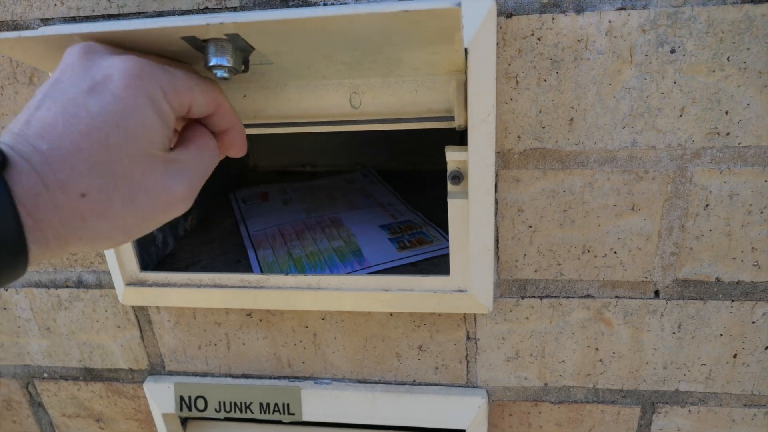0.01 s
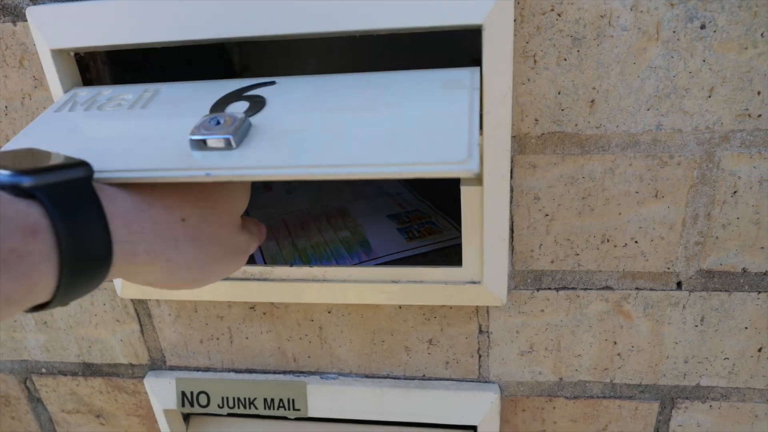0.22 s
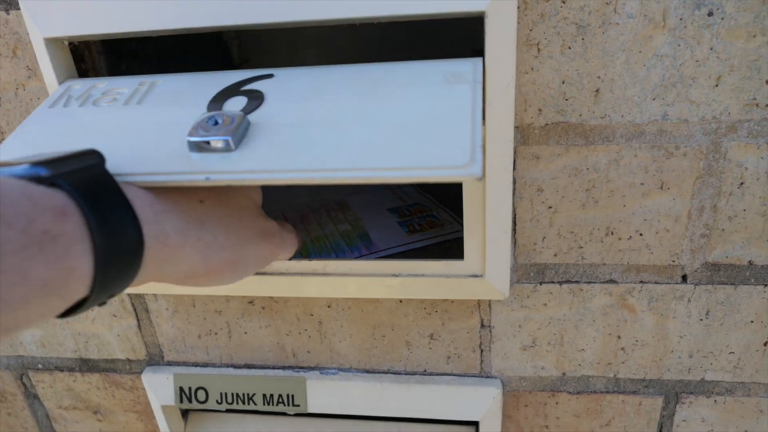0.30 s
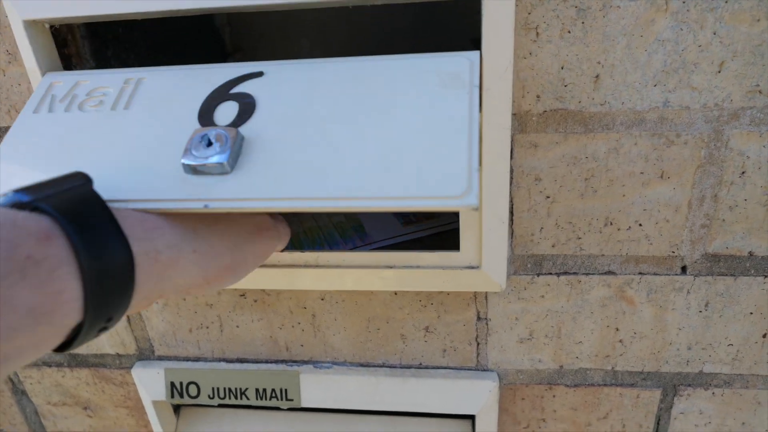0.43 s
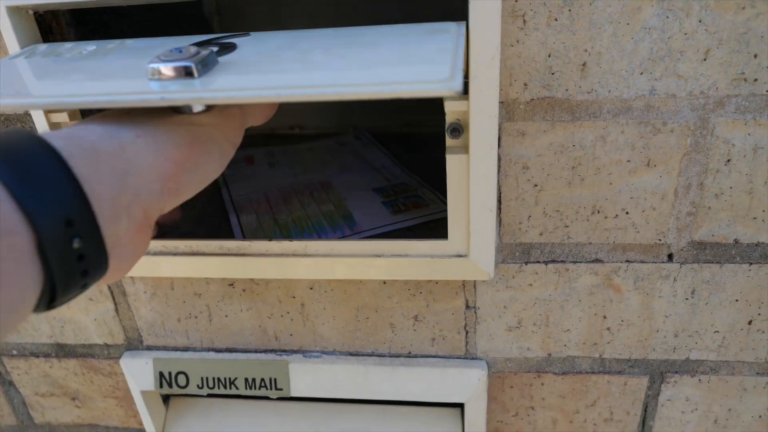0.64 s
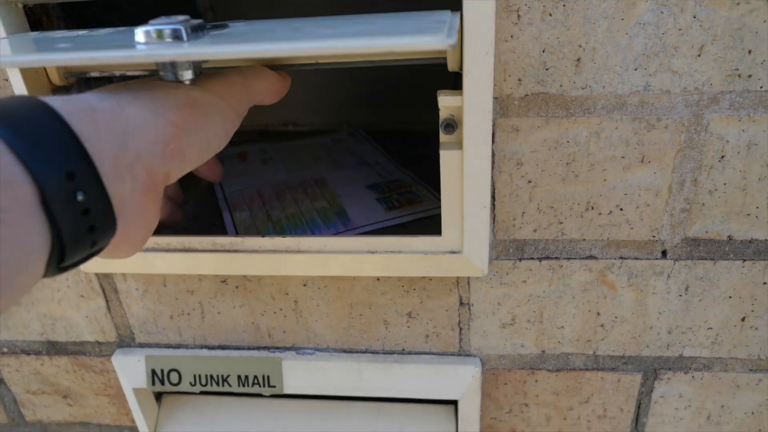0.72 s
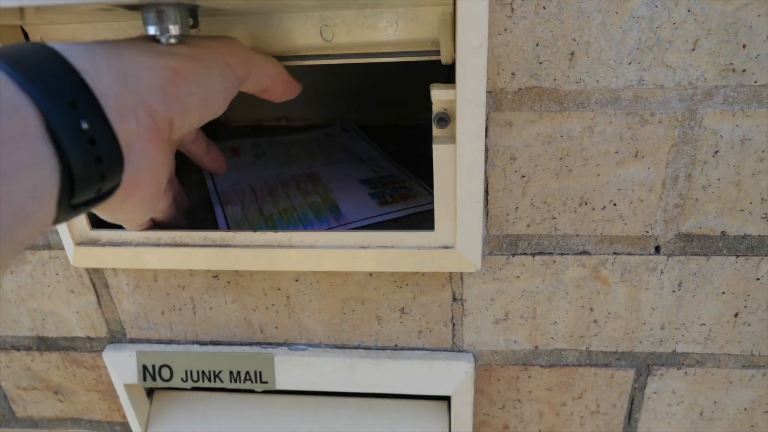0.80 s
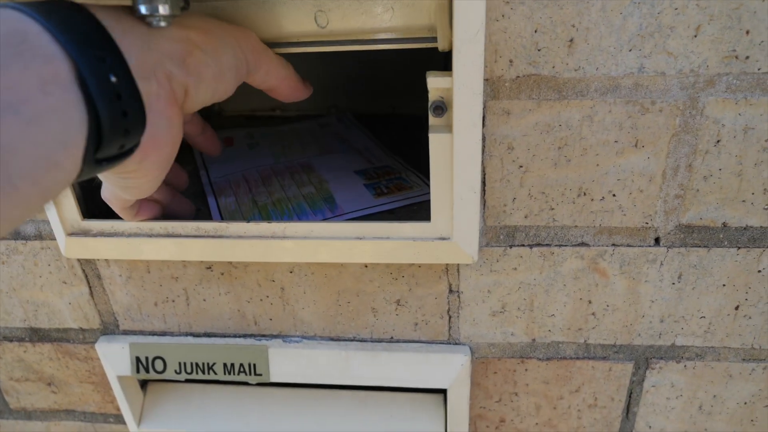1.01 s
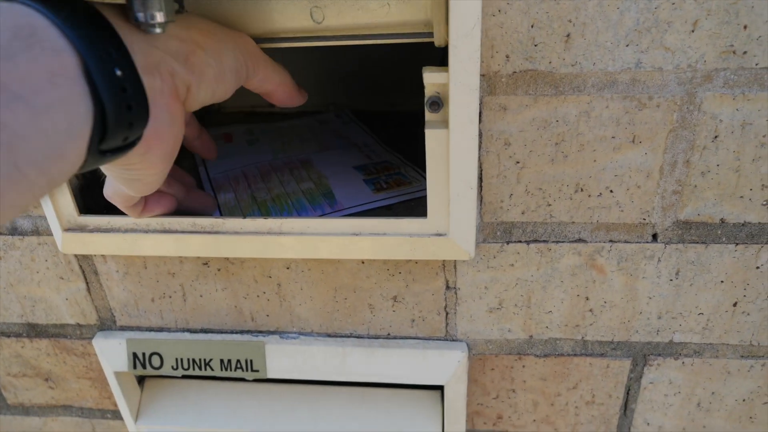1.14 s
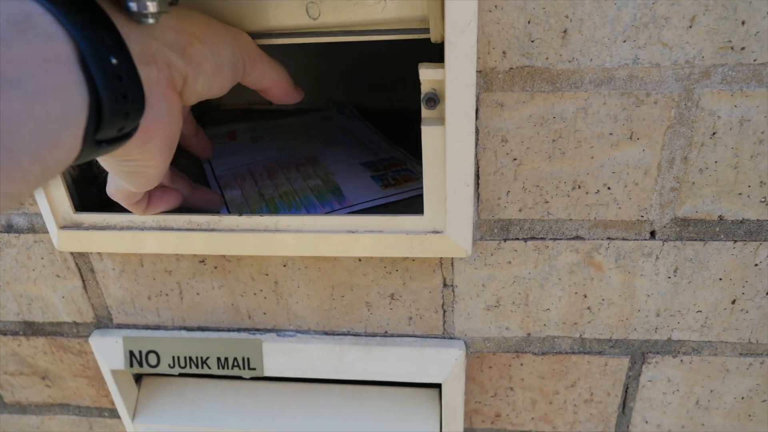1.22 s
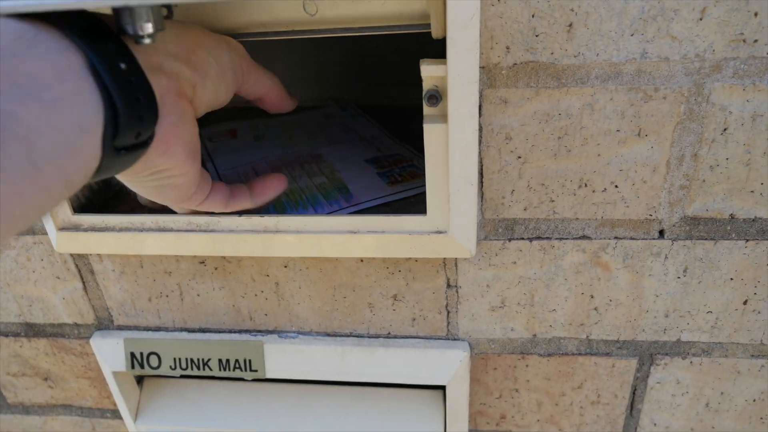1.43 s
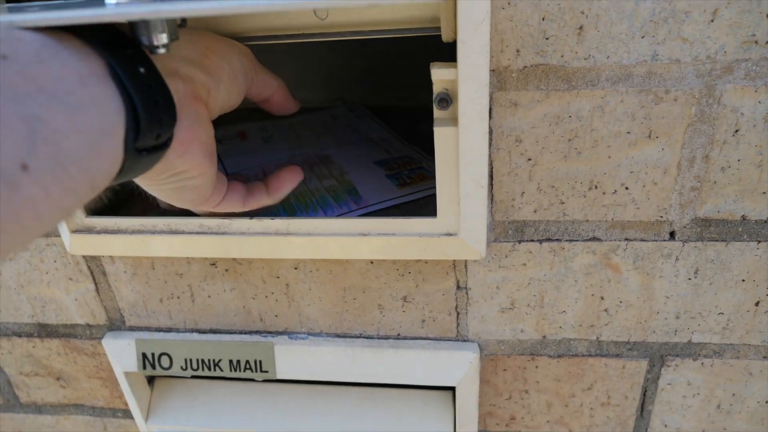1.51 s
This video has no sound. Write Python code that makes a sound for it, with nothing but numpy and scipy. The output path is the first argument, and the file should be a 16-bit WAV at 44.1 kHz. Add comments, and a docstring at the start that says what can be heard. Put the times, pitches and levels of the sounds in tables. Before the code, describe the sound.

A thin metal letterbox flap scrapes, squeaks and slams with a harsh clank, then paper shuffles

```python
"""A thin metal letterbox flap, let swing by a hand, scrapes, squeaks, slams into overload and rattles with its lock:
blows ring damped modes and a clattering sheet, stick-slip clicks drive the scrapes, a gliding sine squeaks.
Fingers then shuffle paper in the hollow box: fine grains excite a soft boom, a rub and a rustle.
Outdoors, filtered noise makes wind on the microphone and street hiss; sines make a thin whistle that
glides down and a few faint distant tones."""
import sys
import numpy as np
from scipy import signal
from scipy.fft import rfft, irfft
from scipy.io import wavfile
from scipy.ndimage import uniform_filter1d

SR = 44100
rng = np.random.default_rng(int(sys.argv[2]) if len(sys.argv) > 2 else 0)


def file_out(sig):
    """Save sig as 16-bit WAV at sys.argv[1]."""
    # one column per channel
    cols = np.atleast_2d(sig).T
    # limit, then scale
    lim = np.clip(cols, -1, 1)
    pcm = np.round(lim * 32767).astype(np.int16)
    wavfile.write(sys.argv[1], SR, pcm)


N = 70560  # samples, 1.6 s

# flap modes before the blow's tilt, scatter and ring scaling: f/Hz, level/dB, t60/s
FLAP_MODES = [(1578, -13.5, 0.24), (2289.6, -3, 0.28), (3081, -2, 0.075), (3741, -5.5, 0.14),
              (4510, -4, 0.057), (4914, -19, .1), (6900, -18, 0.18), (7850, -14.5, 0.094)]
# lock modes, likewise: f/Hz, level/dB, t60/s
LOCK_MODES = [(4030, -2, 0.034), (5170, -1, 0.014), (6850, 2.5, 0.0096), (7244, -4, 0.083),
              (8780, -6.5, 0.064)]
# blows: t/s, flap level/dB, lock level/dB, clatter peak level/dB, brightness/(dB per octave)
BLOWS = [(0.106, -23.5, -46, -15, 1), (0.1858, -22.5, -20.5, -15.5, -5), (0.2534, 2.5, -8, 10.5, 3),
         (.275, -8, -9, 5.5, 1.5), (0.3504, -35, -35, -20, -0.5), (0.5056, -39, -30, -26.5, -5),
         (0.5527, -41, -19.5, -15.5, 1), (.598, -22.5, -26, -16, -4.5), (0.621, -39, -34, -26, 2),
         (0.647, -36, -47, -19.5, 5), (0.6596, -13, -19, -7, 1), (0.753, -33.5, -41, -20, -1.5)]
# colour of the clattering sheet before tilting: f/Hz, level/dB
CLATTER_COLOUR = [(150, -23.5), (300, -7), (620, -11), (1100, 1), (3800, -1.5), (7500, -8.5), (15400, -32)]
# scrapes of the flap: peak t/s, rise/s, fall/s, level/dB, brightness/(dB per octave)
SCRAPES = [(0.111, 0.012, 0.017, -23.5, -2.5), (0.209, 0.016, 0.029, -17.5, -1),
           (0.29, 0.015, 0.062, -30, -3), (0.419, 0.0174, 0.0082, -31.5, -4),
           (0.511, 0.046, 0.077, -39, -3.5), (0.638, 0.03, 0.023, -21, -3), (0.678, 0.0053, 0.018, -22, 0),
           (0.757, 0.008, 0.013, -29, -2.5), (0.783, 0.0018, 0.022, -35.5, -4.5)]
# squeak that rises while the flap swings down: t/s, f/Hz, level/dB before flutter
SQUEAK = [(.186, 1237, -22), (.2, 1278, -27.5), (.218, 1458, -24), (.245, 1570, -33)]
# scuffs of fingers and paper: peak t/s, rise/s, fall/s, boom level/dB, rub level/dB, rustle level/dB
SCUFFS = [(1.026, 0.0081, 0.015, -38.5, -34, -40.5), (1.071, 0.0092, 0.019, -28.5, -29.5, -36.5),
          (1.114, 0.0012, 0.017, -28, -34, -47.5), (1.134, 0.0041, 0.019, -24, -34, -43),
          (1.173, 0.003, 0.021, -37, -47.5, -45.5), (1.257, 0.023, 0.026, -24, -35.5, -39),
          (1.356, 0.011, 0.017, -33.5, -48, -41), (1.387, 0.0079, 0.018, -25, -40, -46),
          (1.443, 0.0072, 0.033, -29, -30, -39), (1.499, 0.02, 0.012, -29, -26.5, -34),
          (1.592, 0.028, .02, -23.5, -32, -49)]
# colour of paper rubbing the box floor: f/Hz, level/dB
RUB_COLOUR = [(400, 6.5), (1000, 7.5), (1800, 1.5), (3200, -4)]
# colour of the paper rustle: f/Hz, level/dB
RUSTLE_COLOUR = [(2800, -1), (5000, -1.5), (8500, -7), (12000, -17.5), (15400, -15)]
# thin whistle outdoors: t/s, f/Hz, level/dB before flutter
WHISTLE = [(1.248, 3410, -51), (1.3, 3315, -47), (1.43, 3186, -44), (1.56, 3170, -46), (1.578, 3220, -64)]
# strength of the wind on the microphone: t/s, level/dB
WIND_LEVEL = [(0, -37), (.11, -35), (.25, -28.5), (.46, -36), (.68, -28.5), (.85, -21.5), (1.17, -32),
              (1.3, -25), (1.6, -37.5)]
# colour of the wind rumble: f/Hz, level/dB
WIND_COLOUR = [(8, 17), (30, -6), (55, -15), (110, -21), (400, -37)]
# colour of the street hiss: f/Hz, level/dB
STREET_COLOUR = [(250, 3.5), (1400, -1), (2200, -6), (8500, -14), (11000, -26.5), (15400, -31)]
# faint distant tones: start t/s, length/s, f/Hz, level/dB
DISTANT_TONES = [(-.02, 0.2, 812, -45.5), (0.386, 0.17, 798, -47.5), (0.924, 0.052, 1530, -49)]

# blows: FREE_RING and LOCK_RING multiply the mode t60s; the hardest blow rings free for FREE_S
FREE_RING, LOCK_RING, FREE_S = 2.23, 0.95, 0.018
DAMPED_T60_S, CLATTER_T60_S = 0.076, 0.066  # clatter at MID_HZ
# a blow counts as fully soft at SOFT_DB; it then scatters mode levels and pitches (DETUNE: ratio)
SOFT_DB, SCATTER_DB, DETUNE = -12, 5, 0.015
CONTACT_S = 0.00072  # build-up time of a fully soft blow
FRAME_HZ, FRAME_T60_S, FRAME_DB = 1027, 0.38, -15  # level relative to the flap
SCRAPE_PER_S, SCRAPE_SPREAD_DB = 1000, 2.5
SCRAPE_FLAP_DB, SCRAPE_BOOM_DB = -11.5, -33.5
SHEET_MODES, SHEET_T60_S = 220, 0.052  # decay at MID_HZ; lower modes ring longer
MID_HZ = 3000  # pivot of brightness and sheet decay
RING = 7000  # samples kept of a ringing
PAPER_PER_S, PAPER_SPREAD_DB = 8800, 3
PAPER_T60_S, RUSTLE_T60_S = 0.042, 0.015  # both at MID_HZ
BOX_HZ, BOX_T60_S = 237, 0.1
SQUEAK_FLUTTER_DB, WHISTLE_FLUTTER_DB = 4.5, 2.2
STREET_DB = -50
OVERLOAD, TOP_HZ = 1.0, 15600  # clipping amplitude, upper band edge


def mode_ring(modes, slow, tilt_db, soft):
    """Sum of decaying modes; a soft blow lands anywhere, so their levels and pitches scatter."""
    hz, db, t60 = modes
    level_scatter = SCATTER_DB * soft * rng.standard_normal(hz.shape)
    pitch_scatter = 1 + DETUNE * soft * rng.standard_normal(hz.shape)
    gain = undb(db + tilt_db * np.log2(hz / MID_HZ) + level_scatter)
    return (gain * decay(hz * pitch_scatter, t60 * slow)).sum(axis=0)


def blows():
    """Impacts ring flap and lock and clatter; soft ones also ring the frame, hard ones ring free before damping."""
    out, t = np.zeros(N + RING), np.arange(RING) / SR
    flap_modes, lock_modes = columns(FLAP_MODES), columns(LOCK_MODES)
    for start, flap_db, lock_db, clatter_db, tilt_db in BLOWS:
        soft = np.clip(flap_db / SOFT_DB, 0, 1)
        damping = np.exp(-np.log(1000) * np.maximum(t - FREE_S * (1 - soft), 0) / DAMPED_T60_S)
        flap = undb(flap_db) * mode_ring(flap_modes, FREE_RING, tilt_db, soft) * damping
        lock = undb(lock_db) * mode_ring(lock_modes, LOCK_RING, tilt_db, soft)
        frame = soft * undb(flap_db + FRAME_DB) * decay(FRAME_HZ, FRAME_T60_S)
        clatter = sheet(CLATTER_T60_S, tilted(tilt_db))
        clatter = undb(clatter_db) * clatter / np.max(np.abs(clatter))
        attack = np.minimum(t / (CONTACT_S * soft + 1 / SR), 1)
        i = int(start * SR)
        out[i:i + RING] += attack * (flap + lock + frame + clatter)
    return out[:N]


def scrape():
    """Stick-slip clicks ring the sheet, each scrape at another spot; flap and box ring along."""
    drags = unit(grit(SCRAPE_PER_S, SCRAPE_SPREAD_DB)) * swells(SCRAPES, axis=3)
    out = np.zeros(N)
    for drag, row in zip(drags, SCRAPES):
        out = out + drive(drag, sheet(SHEET_T60_S, tilted(row[4]), size=4500))
    all_drags = drags.sum(axis=0)
    hz, db, t60 = columns(FLAP_MODES)
    flap = (undb(db) * decay(hz, np.minimum(t60, DAMPED_T60_S))).sum(axis=0)
    out = out + undb(SCRAPE_FLAP_DB) * drive(all_drags, flap)
    return out + undb(SCRAPE_BOOM_DB) * drive(all_drags, decay(BOX_HZ, BOX_T60_S))


def squeak():
    """The swinging flap squeaks: a rising near-pure tone with quick level flutter."""
    return tone(SQUEAK, SQUEAK_FLUTTER_DB, size=100)


def handling():
    """Paper grains boom in the box's air, rub on its floor and rustle, each scuff at another spot."""
    grains = unit(grit(PAPER_PER_S, PAPER_SPREAD_DB))
    out = drive(grains * swells(SCUFFS, axis=3).sum(axis=0), decay(BOX_HZ, BOX_T60_S))
    for rub, rustle in zip(swells(SCUFFS, axis=4), swells(SCUFFS, axis=5)):
        out = out + drive(grains * rub, sheet(PAPER_T60_S, RUB_COLOUR, size=2500))
        out = out + drive(grains * rustle, sheet(RUSTLE_T60_S, RUSTLE_COLOUR, size=1000))
    return out


def whistle():
    """A thin near-pure tone glides down, its level fluttering slowly."""
    return tone(WHISTLE, WHISTLE_FLUTTER_DB, size=500)


def wind():
    """Wind buffets the microphone: low rumbling noise, evened out and then shaped by the gusts."""
    rumble = colour(rng.standard_normal(N), WIND_COLOUR)
    power = uniform_filter1d(uniform_filter1d(rumble ** 2, size=4000), size=4000)
    return rumble / np.sqrt(power) * undb(curve(WIND_LEVEL, axis=1))


def street():
    """Steady coloured noise as faint street hiss."""
    return unit(colour(rng.standard_normal(N), STREET_COLOUR)) * undb(STREET_DB)


def distant_tones():
    """Faint steady sines with short fades."""
    out, t = np.zeros(N), np.arange(N) / SR
    for start, length, hz, db in DISTANT_TONES:
        fade = np.clip(np.minimum(t - start, start + length - t) / 0.016, 0, 1)
        out = out + undb(db) * fade * np.sin(2 * np.pi * hz * t)
    return out


def tone(table, flutter_db, size):
    """A gliding near-pure tone whose level flutters over `size` samples."""
    gain = uniform_filter1d(undb(curve(table, axis=2, outside=-87)), size)
    flutter = unit(uniform_filter1d(rng.standard_normal(N), size))
    phase = 2 * np.pi * np.cumsum(curve(table, axis=1)) / SR
    return np.sqrt(2) * gain * undb(flutter_db * flutter) * np.sin(phase)


def grit(per_s, spread_db):
    """Random clicks of either sign and scattered size."""
    chance, sign, size = rng.random((N, 3)).T
    strength = undb(-spread_db * np.log(1 - 0.99 * size))
    return (chance < per_s / SR) * np.sign(sign - 0.5) * strength


def swells(table, axis):
    """Bell-shaped swells (peak, rise, fall), one row each, at the level of one column."""
    a, t = columns(table), np.arange(N) / SR
    width = np.where(t < a[0], a[1], a[2])
    return undb(a[axis]) * np.exp(-((t - a[0]) / width) ** 2)


def decay(hz, t60, size=RING):
    """Exponentially ringing modes, one row each."""
    t = np.arange(size) / SR
    return np.exp(-np.log(1000) * t / t60) * np.sin(2 * np.pi * hz * t)


def sheet(t60, shape, size=RING):
    """Response of a thin sheet: many close modes of chance pitch and strength, coloured."""
    pitch, strength = rng.random((SHEET_MODES, 2, 1)).transpose(1, 0, 2)
    place = (np.arange(SHEET_MODES)[:, None] + pitch) / SHEET_MODES
    hz = 150 + 15400 * place ** 1.5
    gain = (2 * strength - 1) ** 3 * hz ** 0.3
    modes = gain * decay(hz, t60 * (MID_HZ / hz) ** 0.3, size)
    return colour(modes.sum(axis=0), shape)


def drive(x, response):
    """Clicks ring a body; a steady stream keeps its level."""
    return signal.fftconvolve(x, response / np.sqrt(np.sum(response ** 2)))[:N]


def tilted(tilt_db):
    """The clatter colour, brighter or darker by dB per octave."""
    return [(f, db + tilt_db * np.log2(f / MID_HZ)) for f, db in CLATTER_COLOUR]


def colour(x, table):
    """Minimum-phase filter with the tabled shape, falling 24 dB per octave outside it."""
    a, n = np.array(table, float), 8192
    octave = np.log2(np.maximum(np.arange(n // 2 + 1) * SR / n, 1))
    edge = np.log2(a[:, 0])
    beyond = np.maximum(edge[0] - octave, 0) + np.maximum(octave - edge[-1], 0)
    db = np.interp(octave, edge, a[:, 1]) - 24 * beyond
    # folding the cepstrum makes the filter causal
    cepstrum = irfft(np.maximum(db, -120) * np.log(10) / 20)
    cepstrum[1:n // 2] *= 2
    cepstrum[n // 2 + 1:] = 0
    return signal.fftconvolve(x, irfft(np.exp(rfft(cepstrum))))[:len(x)]


def curve(table, axis, outside=None):
    """One column of a table over time."""
    a = np.array(table, float)
    return np.interp(np.arange(N) / SR, a[:, 0], a[:, axis], left=outside, right=outside)


def columns(table):
    """Table columns, each upright so that rows broadcast over time."""
    return np.array(table, float).T[:, :, None]


def undb(db):
    """dB to gain."""
    return 10 ** (np.asarray(db, float) / 20)


def unit(x):
    """Scale to rms 1."""
    return x / np.sqrt(np.mean(x ** 2))


def scene():
    """All sources at one microphone."""
    flap = blows() + scrape() + squeak()
    background = whistle() + wind() + street() + distant_tones()
    return (flap + handling() + background)[None]


def record(dry):
    """The input clips at overload, then a steep low-pass cuts the top."""
    low_pass = signal.ellip(8, 0.2, 40, TOP_HZ, fs=SR, output="sos")
    return signal.sosfilt(low_pass, np.clip(dry, -OVERLOAD, OVERLOAD))


dry = scene()
out = record(dry)
file_out(out)
```